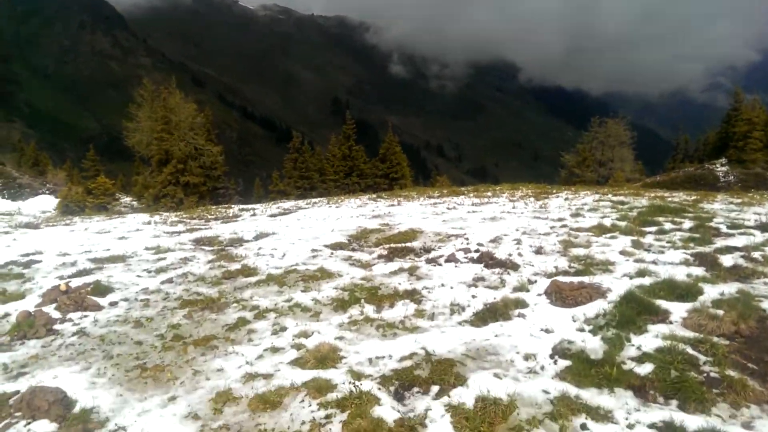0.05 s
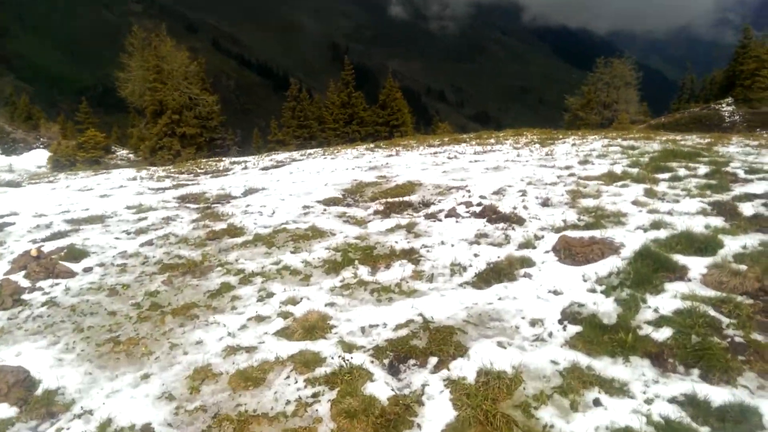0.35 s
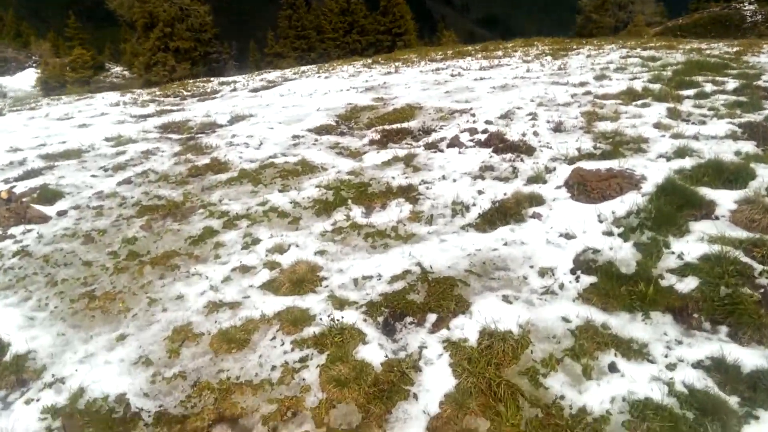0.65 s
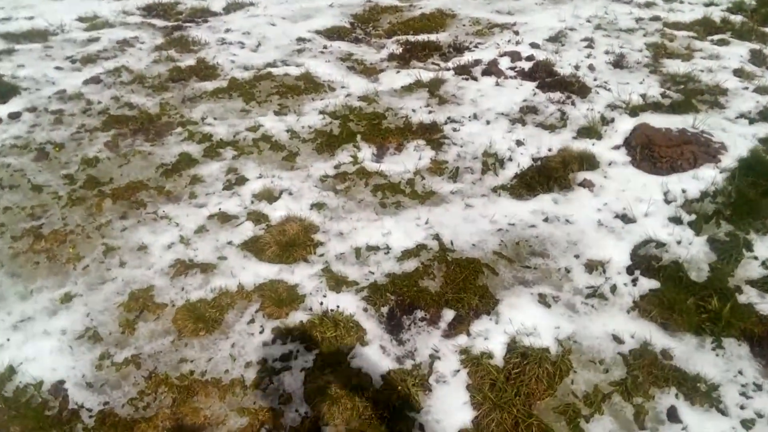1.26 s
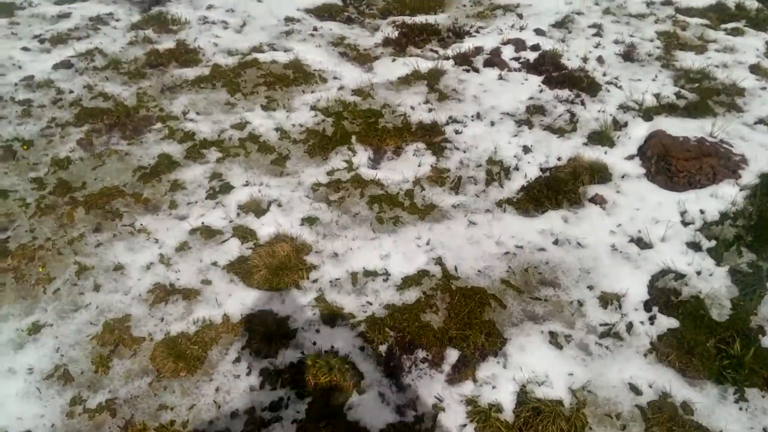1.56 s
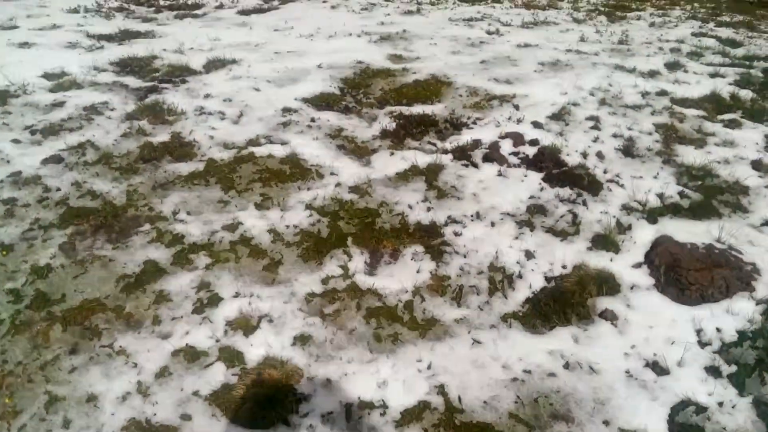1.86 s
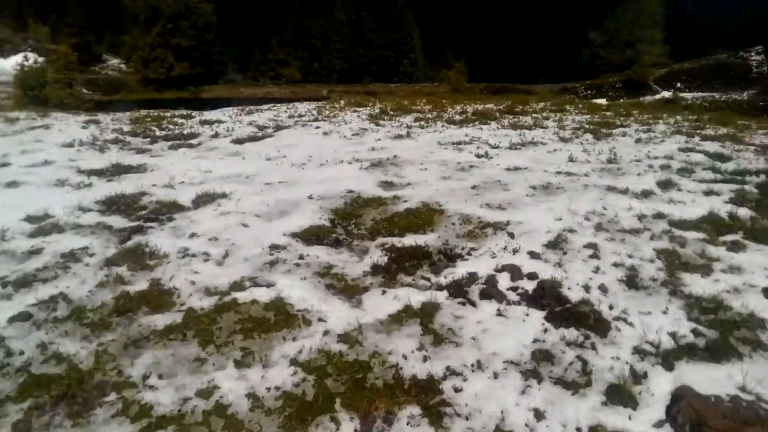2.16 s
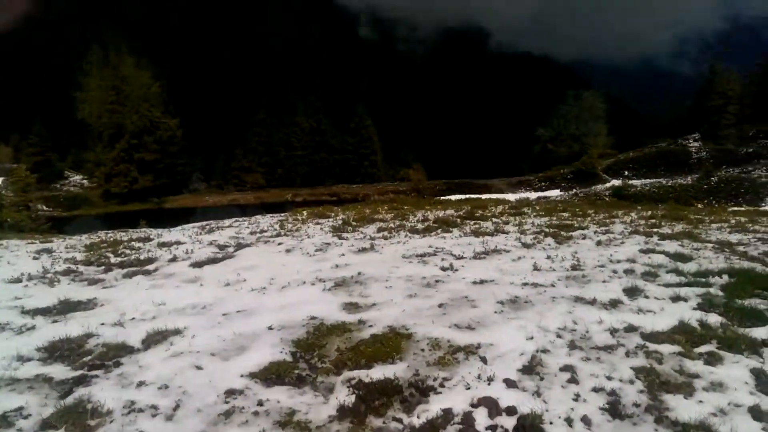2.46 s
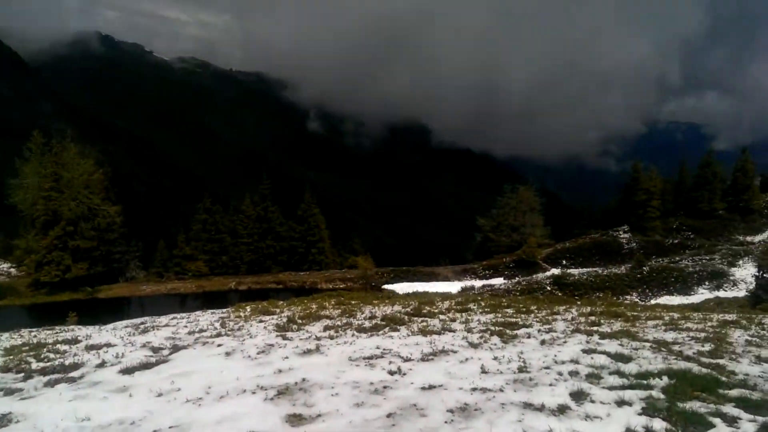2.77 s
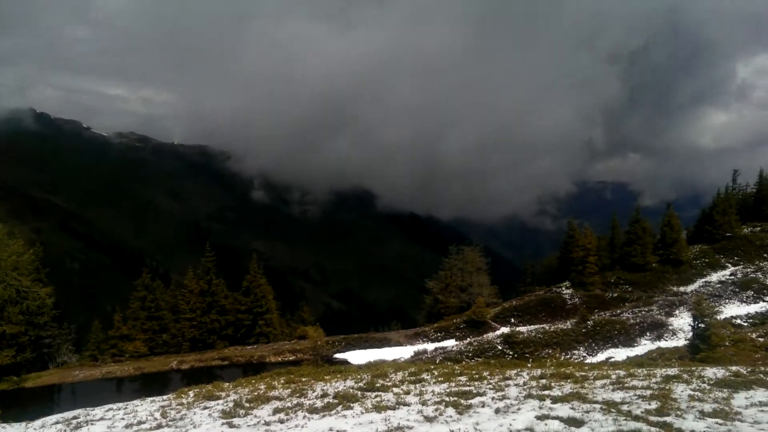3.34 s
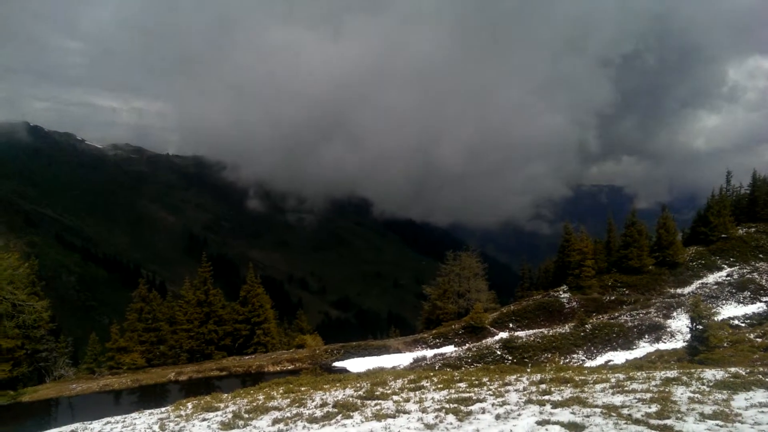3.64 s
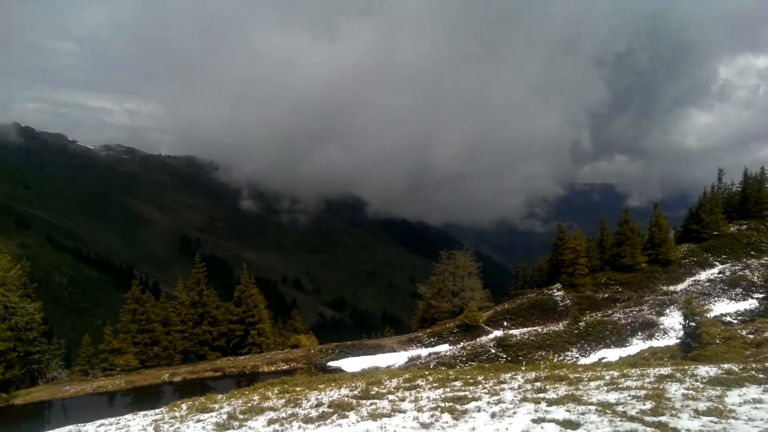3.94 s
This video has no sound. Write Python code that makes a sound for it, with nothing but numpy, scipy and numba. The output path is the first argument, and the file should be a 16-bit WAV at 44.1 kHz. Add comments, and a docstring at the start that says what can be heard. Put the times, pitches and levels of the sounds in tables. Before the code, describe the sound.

Wind rumbles on a handheld microphone throughout, buffeting left and right with low thumps, strongest from about 1 to 1.6 seconds. Underneath, slow steps rustle softly over wet snowy grass, with a crisp crunch near 1.1 seconds and smaller crunches and clothing swishes after. The steps stop and the wind dips around 2.8 seconds. Sharp handling clicks come at 3 and 3.3 seconds as the gusts return.

```python
"""Slow steps over wet snowy grass on a windy mountain slope, heard from a handheld camera.
Snow, grass and clothing rustle as a dense train of tiny impulses, with a few crisp crunches and rubs,
until the walker stops; the camera then clicks in the hand, each impact ringing its casing briefly.
Turbulent wind rumbles and buffets the two microphone ports independently, over a faint hiss of air."""
import sys
import numpy as np
from scipy import signal
from scipy.fft import rfft, irfft
from scipy.io import wavfile
from scipy.ndimage import uniform_filter1d
from numba import njit

SR = 44100
rng = np.random.default_rng(int(sys.argv[2]) if len(sys.argv) > 2 else 0)


def dump_mix(stems):
    """Bounce the given channels to the path in sys.argv[1] as a 16-bit WAV at rate SR."""
    frames = np.atleast_2d(stems).T  # one column per channel
    limited = np.clip(frames, -1, 1)  # hard clip at full scale
    pcm = np.round(limited * 32767).astype(np.int16)
    wavfile.write(sys.argv[1], SR, pcm)


N = 176400
GRAINS_PER_S, GRAIN_SPREAD_DB = 9000, 0.5  # friction grains of the rustle and the scrapes


def undb(db):
    """Amplitude ratio of a level in decibels."""
    return 10 ** (np.asarray(db) / 20)


def unit(x):
    """Normalisation to an rms of 1."""
    return x / np.sqrt(np.mean(x ** 2))


def steady(x):
    """Division by the running rms evens out slow changes of level."""
    return x / np.sqrt(uniform_filter1d(x ** 2, size=5000) + 1e-12)


def curve(table, column):
    """Linear interpolation of one table column in time."""
    rows = np.array(table)
    return np.interp(np.arange(N) / SR, rows[:, 0], rows[:, column])


def colour(x, table):
    """Spectral shaping, one output per level column; white noise keeps its mean power over the outputs."""
    rows = np.array(table, float)
    log_f = np.log(np.maximum(np.arange(N // 2 + 1) * SR / N, 1))
    gains = undb([np.interp(log_f, np.log(rows[:, 0]), db) for db in rows[:, 1:].T])
    return irfft(rfft(x) * unit(gains), N)


def band(x, hz, width):
    """Band-pass resonance with steep skirts; width is the relative bandwidth."""
    edges = np.minimum(hz * np.exp(np.array([-width, width]) / 2), SR / 2 - 1)
    return signal.sosfilt(signal.butter(2, edges, "band", fs=SR, output="sos"), x)


@njit
def lowpass(x, hz):
    """Two integrators in a feedback loop form a low-pass with a moving cutoff."""
    y, band_state, low_state = np.empty(len(x)), 0., 0.
    for i in range(len(x)):
        g = np.tan(np.pi * hz[i] / SR)
        bandpassed = (band_state + g * (x[i] + 1e-18 - low_state)) / (1 + g * (g + 1.5))
        y[i] = low_state + g * bandpassed
        band_state, low_state = 2 * bandpassed - band_state, 2 * y[i] - low_state
    return y


def fluctuation(per_s):
    """Random modulation of rms 1: Gaussian values joined by ramps."""
    hold = max(int(SR / per_s), 1)
    stairs = rng.standard_normal(N)[np.arange(N) // hold]
    return unit(uniform_filter1d(stairs, hold))


def grains(per_s, spread_db):
    """Shot noise: random impulses of either sign with exponentially distributed levels."""
    hits = rng.random(N) < per_s / SR
    signs = np.sign(rng.standard_normal(N))
    sizes = undb(spread_db * np.minimum(rng.exponential(size=N), 4))
    return unit(hits * signs * sizes)


def swell(at, half_ms):
    """Gaussian envelope of a stroke; half_ms is its standard deviation."""
    return np.exp(-((np.arange(N) / SR - at) * 1000 / half_ms) ** 2 / 2)


def pan(left_db):
    """Level difference between the ports, as gains relative to the right one."""
    return np.array([[undb(left_db)], [1]])


def distant_air():
    """Broadband noise, uncorrelated between the ports, forms a faint steady floor."""
    # spectrum of the air: f/Hz, relative level/dB
    spectrum = [(600, 5), (3700, -3), (4500, -15), (7000, -16.5), (10200, -12), (16000, -22.5)]
    return colour(rng.standard_normal((2, N)), spectrum) * undb(-63.5)


def wind_strength_db(port):
    """Incoherent sources add in power: a breeze, and gusts that rise quickly, hold and decay."""
    # breeze between the gusts: t/s, left level/dB, right level/dB
    breeze = [(0.0, -52.5, -46), (0.5, -36, -44.5), (0.7, -39.5, -46), (0.82, -68, -60), (0.94, -63, -64),
              (1.0, -39.5, -47), (2.2, -48.5, -43), (2.56, -51, -44), (2.72, -74, -47.5), (2.83, -63, -75),
              (3.0, -61, -44.5), (3.25, -42, -38), (4.0, -58.5, -45)]
    # gusts on one port: start t/s, duration/s, level/dB, port (0 left, 1 right)
    gusts = [(0.215, 0.5, -36.5, 0), (0.834, 0.032, -39.5, 0), (0.96, 0.044, -33, 1),
             (1.001, 0.056, -33.5, 0), (1.121, .11, -31, 1), (1.247, 0.08, -28, 1), (1.13, 0.247, -32.5, 0),
             (1.366, .14, -30, 1), (1.385, 0.18, -29.5, 0), (1.62, 0.059, -33, 1), (1.893, 0.089, -30.5, 1),
             (1.969, 0.13, -34, 0), (2.338, 0.018, -36, 1), (2.456, 0.091, -38.5, 0),
             (2.459, 0.075, -35, 1), (3.064, 0.053, -39, 0), (3.159, 0.025, -31.5, 1),
             (3.381, 0.11, -35, 1), (3.836, 0.14, -37.5, 1)]
    attack_s, release_s = .008, .02
    t = np.arange(N) / SR
    power = undb(curve(breeze, 1 + port)) ** 2
    for at, length, db, side in gusts:
        if side == port:
            rise = np.clip((t - at) / attack_s, 0, 1)
            fall = np.exp(-np.maximum(t - at - length, 0) / release_s)
            power += (undb(db) * rise * fall) ** 2
    return 10 * np.log10(power)


def wind(port):
    """Turbulence at one port: slow pressure swings rumble; stronger wind has smaller, brighter eddies."""
    # spectrum of the slow pressure swings: f/Hz, relative level/dB
    rumble_spectrum = [(14, 1.5), (50, -6), (85, -12), (130, -21.5), (200, -33), (400, -84)]
    full_wind_db, full_rumble_db = -40, (-25, -22.5)[port]
    reference_hz, reference_db, db_per_octave = 274.3, -37, 24.5  # eddy cutoff against wind strength
    strength_db = wind_strength_db(port)
    surge = undb(3.5 * fluctuation(per_s=22))  # common to rumble and eddies
    rumble = colour(rng.standard_normal(N), rumble_spectrum)[0]
    rumble_db = full_rumble_db + 0.62 * np.minimum(strength_db - full_wind_db, 0)
    squall_octaves = 0.57 * np.exp(-((np.arange(N) / SR - 1.33) / 0.2) ** 2)  # rich in small eddies
    octaves = (strength_db - reference_db) / db_per_octave + squall_octaves
    cutoff_hz = np.clip(reference_hz * 2 ** octaves, 20, SR / 10)
    low_cut = signal.butter(2, 95.4, "high", fs=SR, output="sos")
    eddies = lowpass(signal.sosfilt(low_cut, grains(per_s=380, spread_db=4.5)), cutoff_hz)
    fizz = undb(-24.5) * eddies  # faint tail above the cutoff
    buffet = lowpass(lowpass(eddies, cutoff_hz), 2 * cutoff_hz) + fizz
    return steady(rumble * surge) * undb(rumble_db) + steady(buffet * surge) * undb(strength_db + 0.5)


def thumps():
    """A single hard eddy passing a port makes one bipolar pressure pulse."""
    # hard eddies: t/s, level/dB, half width/ms, port (0 left, 1 right)
    eddies = [(0.177, -24.5, 1.15, 0), (0.486, -15, 3.4, 1), (0.653, -22, 1.24, 0), (1.546, -19, 1.27, 0),
              (1.898, -15.5, 1.8, 1), (2.061, -13.5, 1.75, 0), (2.3, -25, 1.26, 0), (3.18, -23, 1.22, 1),
              (3.397, -14, 3.3, 1), (3.449, -18, 1.55, 1)]
    t, out = np.arange(N) / SR, np.zeros((2, N))
    for at, db, half_ms, port in eddies:
        passage = 2 * (t - at) / (half_ms / 1000)
        pulse = np.sqrt(2) * passage / np.cosh(np.clip(passage, -20, 20))
        out[port] += undb(db) * pulse
    return out


def swishes():
    """Brief high swishes of cloth ring the left microphone's 10 kHz resonance."""
    # strokes of cloth: middle t/s, half duration/ms, left level/dB
    strokes = [(2.21, 45, -54.5), (2.345, 18, -52), (2.46, 15, -48)]
    left_db = 18
    envelope = sum(undb(db) * swell(at, half_ms) for at, half_ms, db in strokes)
    resonance = unit(band(rng.standard_normal((2, N)), hz=10200, width=0.1))
    return pan(left_db) / undb(left_db) * resonance * envelope


def scrapes():
    """Stick-slip friction of cloth and fingers excites a resonance with broad skirts."""
    # rubs: middle t/s, half duration/ms, right level/dB, resonance f/Hz, left minus right/dB
    rubs = [(.062, 25, -48.5, 4600, -13), (0.406, 13, -51, 4740, -10), (0.873, 20, -51.5, 4200, -14),
            (1.653, 14, -48, 4150, -20), (2.708, 10.8, -40, 3120, -15), (2.713, 42, -60, 1510, 1),
            (3.027, 9, -40.5, 2700, -32), (3.046, 4.4, -42.5, 3000, -12), (3.346, 6, -44, 1320, -24)]
    out = 0
    for at, half_ms, db, hz, left_db in rubs:
        slips = grains(GRAINS_PER_S, GRAIN_SPREAD_DB)
        resonance = unit(band(slips, hz, width=.5))
        skirts = undb(-2.5) * unit(band(slips, hz, width=2.1))
        out += pan(left_db) * unit(resonance + skirts) * swell(at, half_ms) * undb(db)
    return out


def casing_knock(age):
    """Heavily damped modes of the camera body give a short hollow knock."""
    # casing modes: f/Hz, relative level/dB
    modes = [(710, -7), (1300, -17)]
    decay_s = 0.00075
    return sum(undb(db) * np.sin(2 * np.pi * hz * age) for hz, db in modes) * np.exp(-age / decay_s)


def crunches_and_clicks():
    """Impulsive excitation: a damped swing and a knock, with a resonant noise burst and a crisp top."""
    # impacts: t/s, level/dB, resonance f/Hz, burst decay/ms, relative top level/dB, left minus right/dB
    impacts = [(1.073, -18.5, 1520, 2.0, 1, -4), (1.2005, -29, 3800, 3, -6, -10),
               (1.3475, -29, 1750, 2, -26, -5), (1.604, -36, 1350, 4, -1, -4),
               (2.0775, -40, 1200, 3, 2, -4), (2.121, -38, 1300, 3.5, 5, -3), (2.339, -43, 5000, 2, 1, -5),
               (3.0006, -24, 2000, 1.2, -24, -22), (3.0078, -15, 3100, .9, -5, -18),
               (3.039, -24.5, 1250, .6, -2, -8), (3.3498, -24.5, 3050, 1.1, -17, -20)]
    # spectrum of the crisp top: f/Hz, left relative level/dB, right relative level/dB
    top_spectrum = [(2000, -60, -45), (4000, 0, 10.5), (7000, 7, 18), (10600, 19, 17), (15200, 11, -4)]
    snap_cycles, burst_db, width = .7, -4, 0.51
    t, body, top = np.arange(N) / SR, 0, 0
    for at, db, hz, decay_ms, top_db, left_db in impacts:
        age = np.maximum(t - at, 0)
        swing = np.sin(2 * np.pi * hz * age) * np.exp(-age * hz / snap_cycles)
        snap = (swing + casing_knock(age)) * undb(db)
        envelope = (t >= at) * np.exp(-age * 1000 / decay_ms) * undb(db + burst_db) / 2
        noise = rng.standard_normal((3, N))
        bandwidth_gain = np.sqrt(SR / 2 / hz / width)  # restores the power lost outside the band
        burst = band(noise[0] * envelope, hz, width) * bandwidth_gain
        body += pan(left_db) * (snap + burst)
        top += pan(left_db) * noise[1:] * envelope * undb(top_db)
    return body + colour(top, top_spectrum)


def step_rustle():
    """Tiny impulses from wet snow, grass and cloth superpose into a coarse rustle and a fine hiss."""
    # contour of the steps: t/s, coarse level/dB, fine level/dB before its offset
    steps = [(0.08, -51.5, -54), (0.12, -53, -55.5), (0.26, -57, -54), (0.4, -55.5, -50),
             (0.55, -52.5, -50.5), (0.7, -58.5, -57.5), (0.76, -57, -47), (0.8, -64, -62.5),
             (0.86, -50, -52), (0.94, -60.5, -59.5), (1.02, -46.5, -47.5), (1.14, -55.5, -52),
             (1.48, -50, -50.5), (1.52, -55.5, -56.5), (1.66, -50.5, -50.5), (1.78, -57, -55.5),
             (2.04, -60.5, -61.5), (2.2, -57.5, -57.5), (2.5, -59.5, -59), (2.63, -66.5, -71.5),
             (2.66, -58.5, -56.5), (2.775, -58, -52), (2.81, -66, -72), (2.88, -78, -88)]
    # spectra of the coarse and fine grains: f/Hz, left relative level/dB, right relative level/dB
    coarse = [(980, -1, 1), (2700, -6.5, 1), (3730, -8.5, 3), (4300, -9.5, -2), (6060, -10.5, -2.5),
              (6800, -9.5, -12.5), (15000, -50, -19)]
    fine = [(2980, -55, -56), (6900, -18, -11.5), (8300, -5, -5), (9400, -1, -5), (10250, 3, -8.5),
            (11840, -5.5, -16), (14000, -11.5, -21), (16000, -11.5, -23)]
    fine_offset_db = -1.5
    flutter_db = 2 * fluctuation(per_s=60)  # common to both bands
    out = 0
    for spectrum, db in ((coarse, curve(steps, 1)), (fine, curve(steps, 2) + fine_offset_db)):
        crackle = np.array([grains(GRAINS_PER_S, GRAIN_SPREAD_DB) for _ in range(2)])
        out += colour(crackle, spectrum) * undb(db + flutter_db)
    return out


def scene():
    """Linear superposition of air, wind, steps and handling at the two ports."""
    background = distant_air() + np.array([wind(port) for port in range(2)]) + thumps()
    return background + step_rustle() + crunches_and_clicks() + scrapes() + swishes()


def record(dry):
    """Band limiting: the camera's steep low-pass removes the highest treble."""
    cutoff_hz = 15700
    return signal.sosfilt(signal.ellip(10, .2, 80, cutoff_hz, fs=SR, output="sos"), dry)


dry = scene()
out = record(dry)
dump_mix(out)
```